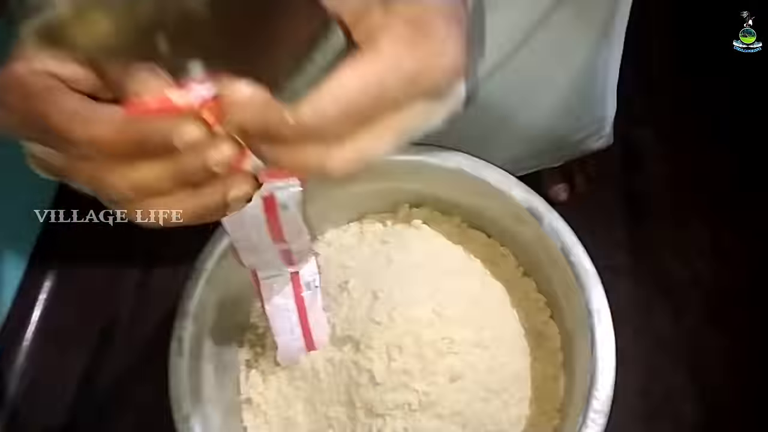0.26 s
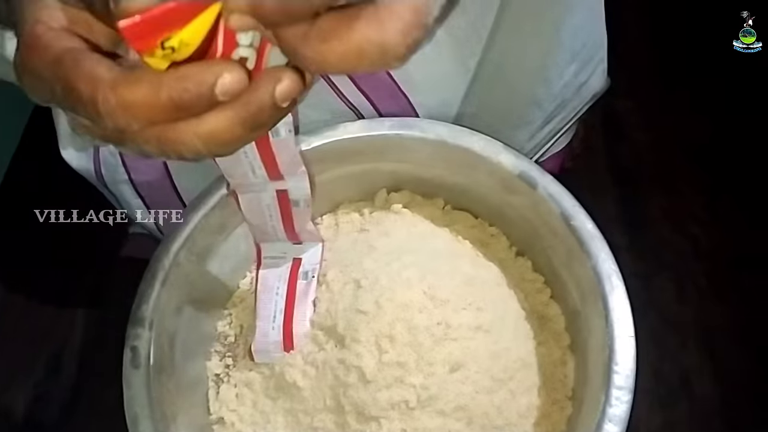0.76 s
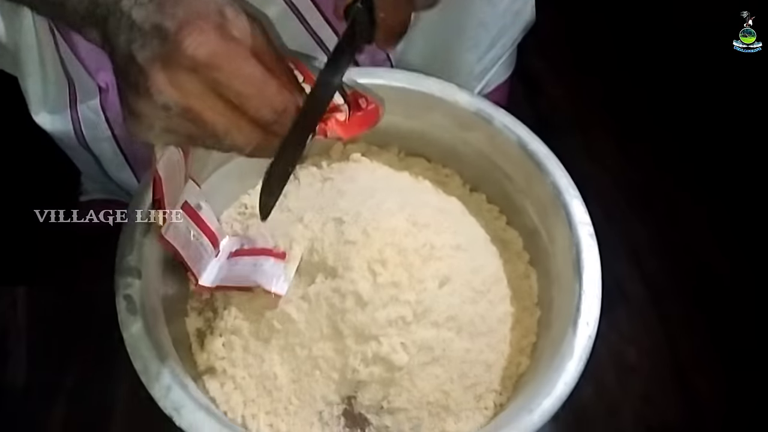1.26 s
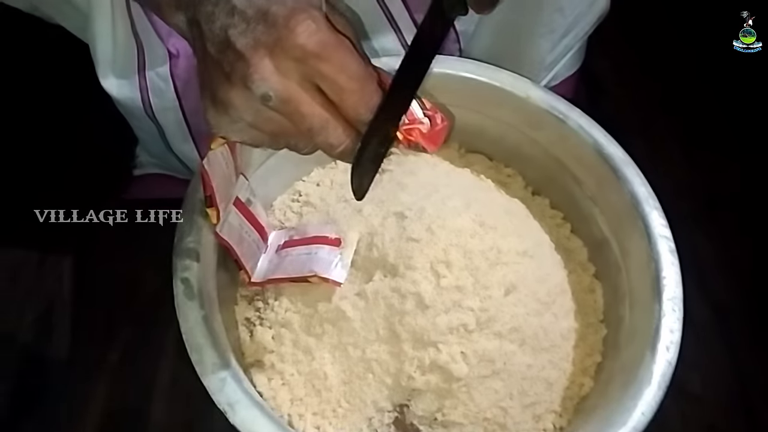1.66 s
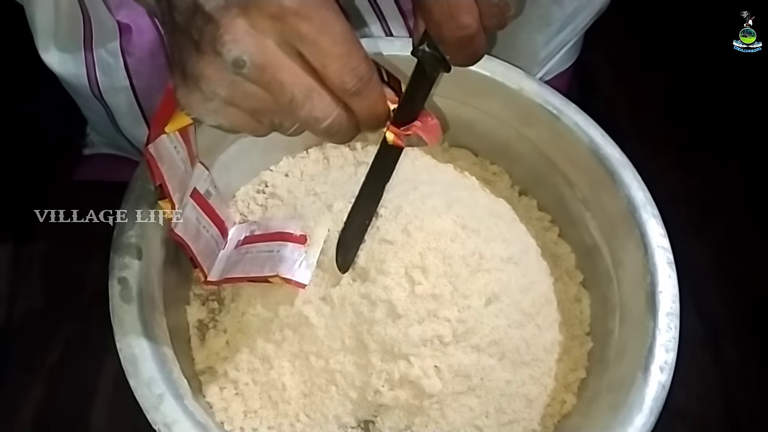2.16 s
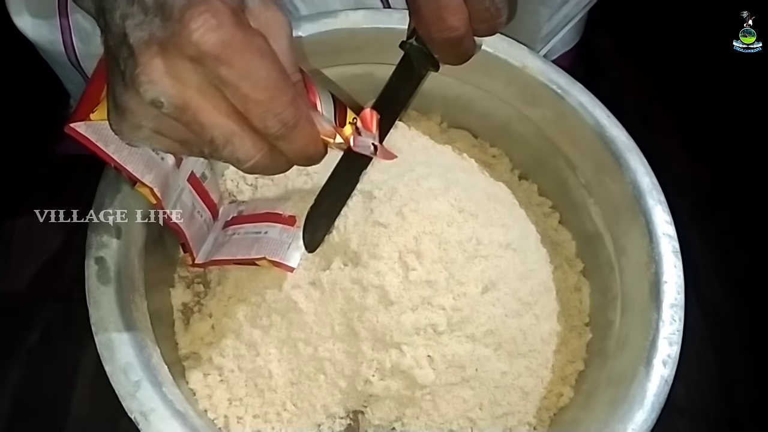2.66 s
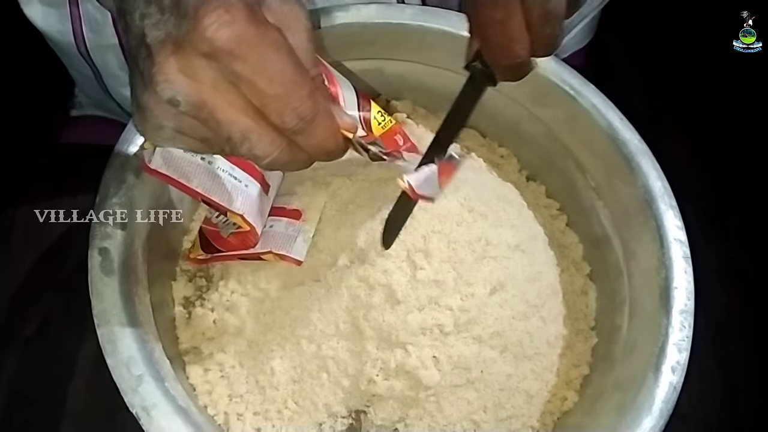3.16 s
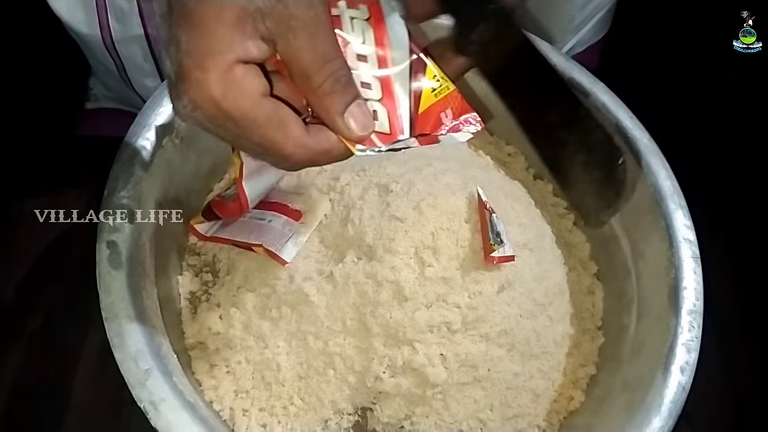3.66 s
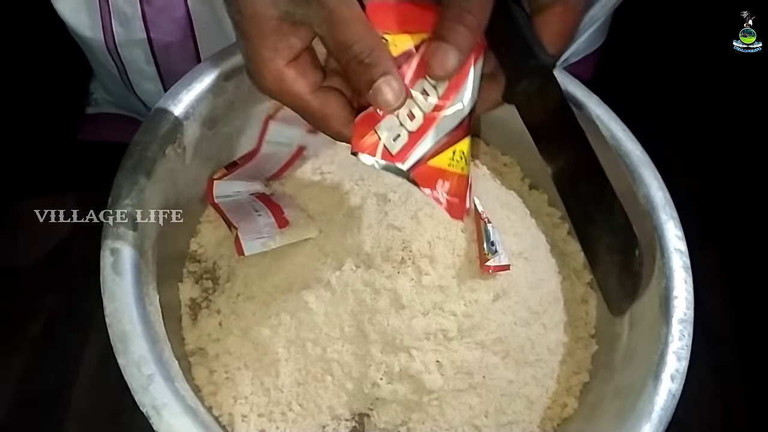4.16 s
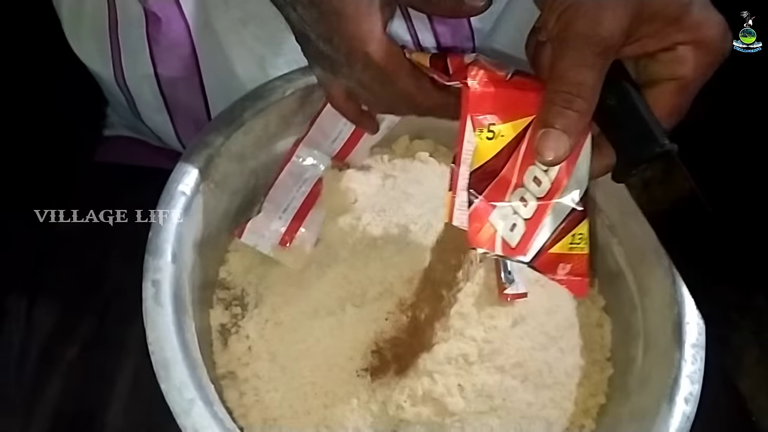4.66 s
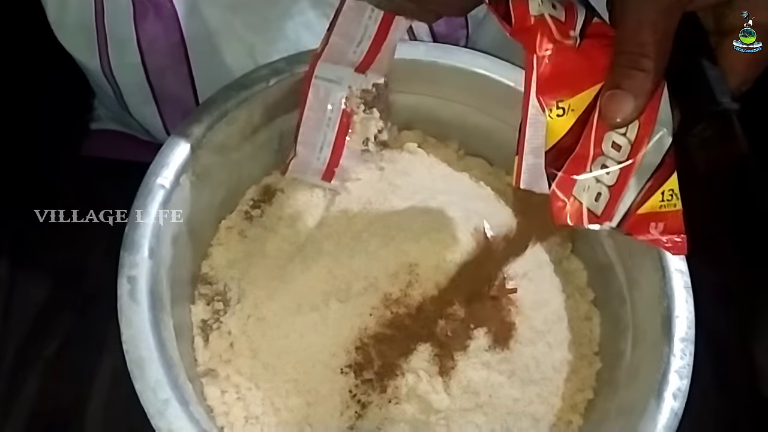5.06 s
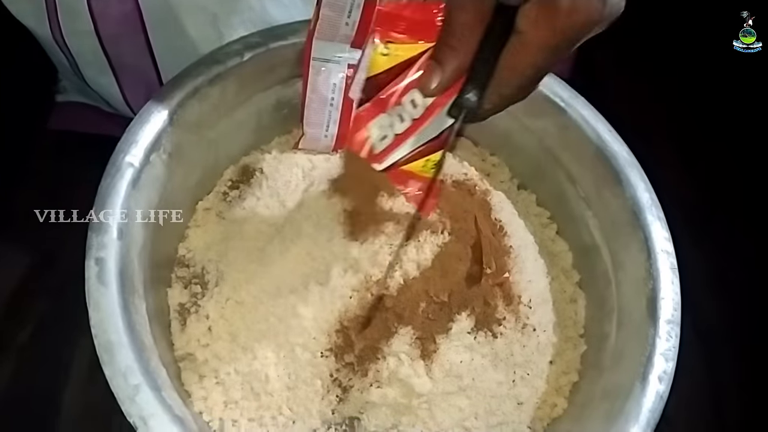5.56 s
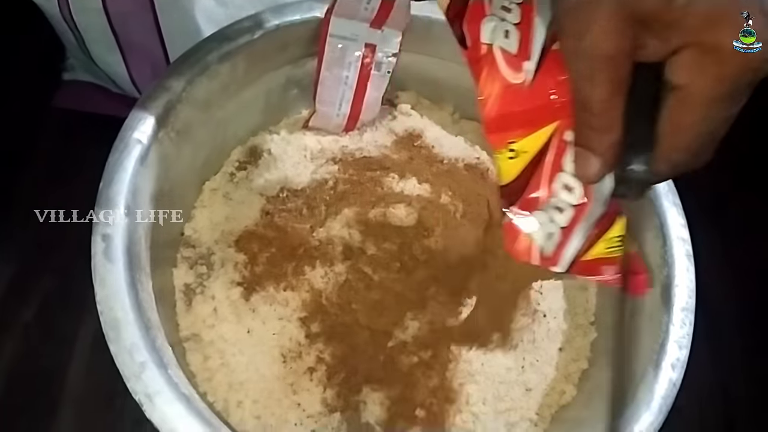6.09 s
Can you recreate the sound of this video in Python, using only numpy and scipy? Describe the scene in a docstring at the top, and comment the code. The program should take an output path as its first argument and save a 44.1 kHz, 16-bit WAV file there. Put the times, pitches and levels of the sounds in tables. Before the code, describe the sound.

Close, dry crinkling of small plastic packets, bursts of crisp knife cutting, then softer rustles and low plops of slack film.

```python
"""Foil-plastic sachets are handled over a steel bowl of flour in a small kitchen.
Fingers pull one from its strip, amid soft air bumps and padded knocks that set the bowl's modes ringing.
A knife then saws through its corner, and it is squeezed and shaken empty with low plops of slack film.
Throughout, creases snap as short slips that ring film patches, some with a short damped tone that
wavers and sags in pitch; tiny fractures crackle under each stroke, over hiss and short noise reflections."""
import sys
import numpy as np
from scipy import signal
from scipy.fft import rfft, irfft, next_fast_len
from scipy.io import wavfile
from scipy.ndimage import uniform_filter1d

SR = 44100
rng = np.random.default_rng(int(sys.argv[2]) if len(sys.argv) > 2 else 0)


def put_to_file(sound):
    """Save the sound as 16-bit audio at rate SR, in the file named by the first command-line argument."""
    columns = np.atleast_2d(sound).T  # one column per channel
    safe = np.clip(columns, -1, 1)
    whole_steps = np.round(safe * 32767)
    wavfile.write(sys.argv[1], SR, whole_steps.astype(np.int16))


N = 279153
TIME = np.arange(N) / SR

# registers of the film, from wide panels to tight creases: low_hz [Hz], high_hz [Hz]
FILM_REGISTERS = [(480, 1450), (1400, 3000), (3150, 5500), (5400, 7300)]
# fingers grip and work the film: peak_s [s], hold_s [s], level_db [dB before the mix],
# body_db [low register, dB against the middle one], brightness_db [dB, weighted by register]
FINGER_STROKES = [(0.005, 0.018, -52.5, -5, 0), (0.087, 0.0081, -51.5, -1, 5),
                  (0.198, 0.059, -46.5, 1.5, 3.5), (0.353, .02, -63, 10, -10), (0.629, .09, -47, -7, 5),
                  (0.782, 0.071, -61, -17, -5), (0.864, 0.048, -49, -4, 2), (1.005, .015, -43.5, -9.5, -3),
                  (1.037, 0.0053, -32.5, -13, 4), (1.101, 0.021, -36.5, -13, -4), (1.168, 0.037, -56, 5, 5),
                  (1.257, .03, -58.5, -10.5, 0), (1.327, 0.057, -51.5, -7, 13),
                  (1.464, .06, -65.5, -15, -10), (1.633, .12, -77.5, -10, -12),
                  (3.65, 0.042, -58, -10, -14), (3.834, .15, -55, -19, -3), (4.01, 0.026, -68, -11, -2),
                  (4.155, .11, -60, -8.5, 1), (4.276, .11, -55, -10, 3), (4.448, 0.055, -45.5, -9.5, -4),
                  (4.553, 0.243, -57, -26, -9), (4.836, .08, -53, -6.5, 0), (4.98, 0.119, -56.5, -15, -1),
                  (5.115, 0.078, -65, -6.5, -2), (5.295, 0.094, -63.5, -14, -1.5), (5.454, .14, -57, -6, 2),
                  (5.936, .03, -53.5, -11, -8.5), (5.987, 0.017, -42.5, -6, 12),
                  (6.03, .075, -47, -15, -0.5), (6.158, 0.16, -62.5, -4, -5)]
# the blade is drawn through the film: peak_s [s], hold_s [s], level_db [dB before the mix],
# body_db [low register, dB against the middle one], brightness_db [dB, weighted by register]
BLADE_STROKES = [(1.959, 0.036, -29, -7.5, 7.5), (2.031, 0.067, -45, -4.5, 4.5),
                 (2.114, 0.032, -38.5, -1.5, 5.5), (2.275, .06, -27, -7.5, 5.5),
                 (2.385, 0.043, -43, -17, 2), (2.439, 0.032, -33.5, -8.5, 1), (2.607, .05, -50.5, -2, -7.5),
                 (2.705, .06, -56, -5, -5), (2.783, .015, -51.5, -2.5, -6), (2.822, 0.012, -45.5, -7, -1),
                 (2.968, .03, -40, -11, 3), (3.072, 0.051, -37, -3, 6), (3.142, 0.013, -44, -16, 5),
                 (3.246, 0.071, -49.5, -3.5, 9), (3.317, 0.0075, -47.5, -16, 6)]


def from_db(db):
    """Decibels to gain."""
    return 10 ** (np.asarray(db) / 20)


def rms_one(x):
    """Scale to unit rms."""
    return x / np.sqrt(np.mean(x ** 2) + 1e-20)


def band(low_hz, high_hz):
    """A gentle band-pass."""
    return signal.butter(2, [low_hz, high_hz], "band", fs=SR, output="sos")


def coloured(x, points):
    """Apply a response drawn through (Hz, dB) points on a logarithmic pitch scale."""
    size = next_fast_len(N + 4096)
    hz, db = np.transpose(points)
    bins_hz = np.maximum(np.fft.rfftfreq(size, 1 / SR), 1)
    gains = from_db(np.interp(np.log(bins_hz), np.log(hz), db))
    return irfft(rfft(x, size) * gains, size)[:N]


def ring(x, hz, t60):
    """A damped resonator: a unit click sets a cosine of about height 1 ringing."""
    radius = from_db(-60 / (t60 * SR))
    angle = 2 * np.pi * hz / SR
    return signal.lfilter([.5, 0, -.5], [1, -2 * radius * np.cos(angle), radius * radius], x + 1e-18)


def drift(rate):
    """A random wander, drawn through this many normal values per second."""
    knots = rng.standard_normal(int(rate * N / SR) + 2)
    return np.interp(TIME * rate, np.arange(len(knots)), knots)


def shares(db):
    """Register levels to gains whose powers add up to 1."""
    gains = from_db(db)
    return gains / np.sqrt(np.sum(gains ** 2, axis=0))


def steady_hiss(level_db):
    """Constant background hiss: random noise with a fixed spectrum."""
    # spectrum of the hiss: pitch_hz [Hz], density_db [relative dB per Hz]
    hiss_points = [(30, -18), (150, -17), (500, -16), (1200, -15), (2300, -12), (3000, -15), (4080, -8),
                   (4450, -12), (4850, -8), (5230, 0), (5550, -6), (6000, -14), (8000, -14)]
    return from_db(level_db) * rms_one(coloured(rng.standard_normal(N), hiss_points))


def kitchen(x, near_db, near_t60, far_db, far_t60, gap_s, size=22050):
    """Quick reflections from bowl and body, and the tail of the room: two decaying bursts of echoes."""
    t, response = TIME[:size], 0
    for level_db, t60 in ((near_db, near_t60), (far_db, far_t60)):
        echoes = rng.standard_normal(size) * from_db(-60 * t / t60) * (t > gap_s)
        response = response + from_db(level_db) * rms_one(echoes) / np.sqrt(size)
    return signal.fftconvolve(x, response)[:N]


def bumps(low_hz, high_hz):
    """Air and hands close to the microphone: each bump is a brief swell of low turbulence."""
    # soft bumps: start_s [s], level_db [dB over the bump, before the microphone], length_s [s]
    bump_rows = [(0.003, -62, 0.056), (0.045, -62, 0.009), (0.203, -50, 0.011), (0.23, -77.5, .018),
                 (0.238, -65.5, .018), (0.299, -60.5, 0.023), (0.328, -55, 0.018)]
    out = np.zeros(N)
    for start_s, level_db, length_s in bump_rows:
        swell = np.sin(np.pi * np.clip((TIME - start_s) / length_s, 0, 1))
        puff = signal.sosfilt(band(low_hz, high_hz), swell * rng.standard_normal(N) + 1e-18)
        out += from_db(level_db) * rms_one(puff) * np.sqrt(length_s * SR / N)
    return out


def bowl_knocks(contact_s):
    """Padded knocks on the flour-damped bowl: each is a smooth push, and every mode answers differently."""
    # bumps of the full bowl: start_s [s], level_db [dB before the band-pass]
    knock_rows = [(1.092, -35.5), (1.113, -51), (1.193, -54.5)]
    # low modes of the bowl: pitch_hz [Hz], peak_db [dB against the knock], t60_s [s]
    bowl_modes = [(135, -11, .12), (203, -4, .2), (256, -6, .12), (281, -2, .22), (314, -1, .19),
                  (336, -4, .14)]
    out = 0
    for start_s, level_db in knock_rows:
        push = np.sin(np.pi * np.clip((TIME - start_s) / contact_s, 0, 1)) ** 2
        for hz, mode_db, t60 in bowl_modes:
            mode = ring(push, hz, t60) * rng.choice([-1, 1])
            # each answer varies by about 1 dB
            gain = from_db(level_db + mode_db + rng.normal())
            out = out + gain * mode / np.abs(mode).max()
    return signal.sosfilt(band(90, 480), out)


def sagging_tone(hz, t60, sag, waver, size=8192):
    """One exponentially damped sine; its pitch wavers at random and sags as it decays."""
    t = TIME[:size]
    unsteady = rms_one(uniform_filter1d(rng.standard_normal(size), size=220))
    # sag and waver are fractions of the pitch
    pitch_hz = hz * (1 - sag * (1 - np.exp(-t / t60)) + waver * unsteady)
    return np.sin(2 * np.pi * np.cumsum(pitch_hz) / SR) * from_db(-60 * t / t60)


def slack_flexing(low_hz, high_hz, t60, sag, waver, count=900, size=3072):
    """The emptying pouch flexes: soft, low plops of slack film, scattered in time and pitch."""
    # course of the flexing: time_s [s], level_db [dB before the microphone]
    flex_course = [(3.75, -103), (3.87, -66.5), (4.05, -87.5), (4.4, -80), (4.7, -72.5), (4.88, -62.5),
                   (5.05, -61), (5.15, -86), (5.9, -87.5), (6.08, -61.5), (6.33, -75)]
    plops = np.zeros(N + size)
    for when, place, strength in rng.random((count, 3)):
        at = int(when * N)
        hz = low_hz * (high_hz / low_hz) ** place
        plops[at:at + size] += (.5 + strength) * sagging_tone(hz, t60, sag, waver, size=size)
    time_s, level_db = np.transpose(flex_course)
    return rms_one(plops[:N]) * from_db(np.interp(TIME, time_s, level_db)) * (TIME > time_s[0])


def damped_tones(sag, waver, size=8192):
    """Short damped tones, low to high, with wavering, sagging pitch, many of them joining a snap."""
    # tones: start_s [s], pitch_hz [Hz], peak_db [dB before the mix], t60_s [s]
    tone_rows = [(.077, 5140, -28.5, 0.0086), (.229, 767, -48.5, 0.11), (0.2714, 5320, -25, 0.016),
                 (.271, 877, -42.5, 0.078), (0.331, 473, -64.5, 0.55), (0.525, 1026, -52, 0.19),
                 (.528, 1414, -51, 0.1), (.529, 1903, -40, 0.057), (0.92, 980, -40, 0.03),
                 (1.508, 1786, -53.5, 0.083), (2.787, 1694, -43.5, 0.15), (2.823, 1710, -48.5, 0.083),
                 (3.644, 2180, -53.5, 0.14), (3.692, 2906, -48.5, 0.044), (4.379, 631, -45.5, 0.025),
                 (4.642, 738, -52, 0.042), (5.031, 2394, -40, 0.019), (5.565, 3820, -32, 0.021),
                 (5.988, 3500, -24, 0.026)]
    out = np.zeros(N + size)
    for start_s, hz, peak_db, t60 in tone_rows:
        at = round(start_s * SR)
        out[at:at + size] += from_db(peak_db) * sagging_tone(hz, t60, sag, waver)
    return out[:N]


def air_push(x):
    """The broad low puff of air that moving film displaces, at unit rms."""
    return rms_one(signal.sosfilt(signal.butter(1, [320, 560], "band", fs=SR, output="sos"), x))


def effort(strokes, rise_db_per_s, sag_db_per_s, fall_db_per_s):
    """A stroke builds up, sags while held and lets go; the strongest sets level, body and brightness in dB."""
    peak_s, hold_s, level_db, body_db, bright_db = np.transpose(strokes)
    t = TIME[::32]
    age = t[:, None] - peak_s
    rise_and_sag = np.minimum(rise_db_per_s * age, -sag_db_per_s * age)
    letting_go = fall_db_per_s * np.maximum(age - hold_s, 0)
    levels = level_db + rise_and_sag - letting_go
    strongest = levels.argmax(axis=1)
    courses = (levels.max(axis=1), body_db[strongest], bright_db[strongest])
    return [np.interp(TIME, t, course) for course in courses]


def crackle(work, per_s, clump_db, ring_cycles, upper_db, top_db, flap_db, count=6):
    """Countless tiny fractures come in clumps; each rings one of several small patches per register."""
    spread_db, patchy_db = 3.5, 5.5  # unequal fracture sizes; uneven tension of the patches
    level_db, body_db, bright_db = work
    # harder work breaks the film faster
    rate = per_s * from_db(.35 * np.maximum(level_db - level_db.max(), -45))
    born = rng.random(N) < rate / SR
    sizes = from_db(spread_db * np.minimum(rng.exponential(1, N), 4)) * rng.choice([-1, 1], N)
    clicks = born * sizes
    # the hand supplies a steady effort, which the fractures share over 20 ms
    clicks = clicks / np.sqrt(np.abs(uniform_filter1d(clicks ** 2, size=882)) + 1e-4)
    clicks = clicks * rms_one(from_db(clump_db * drift(170)))
    # brightness tilts the spectrum, most of all its top
    gains = shares([body_db, 0 * body_db, 0.47 * bright_db + upper_db, 1.12 * bright_db + top_db])
    out = gains[0] * from_db(flap_db) * air_push(clicks)
    for edges, gain in zip(FILM_REGISTERS, gains):
        dealt, patches = rng.integers(0, count, N), 0
        half_step = (edges[1] - edges[0]) / count / 2
        pitches_hz = np.linspace(*edges, count + 1)[1:] - half_step
        for k, hz in enumerate(pitches_hz):
            # patches tighten and slacken as the film moves
            struck = clicks * (dealt == k) * from_db(patchy_db * drift(45))
            patches = patches + ring(struck, hz, ring_cycles / hz)
        out = out + gain * rms_one(signal.sosfilt(band(*edges), patches))
    return out * from_db(level_db)


def finger_rustle():
    """Gripping fingers break the film in fine crackle with a strong upper-middle register."""
    fingers = effort(FINGER_STROKES, rise_db_per_s=1198.5, sag_db_per_s=13, fall_db_per_s=304.5)
    return crackle(fingers, per_s=2400, clump_db=3.5, ring_cycles=10, upper_db=5.0, top_db=-4, flap_db=-4.0)


def knife_cutting():
    """The drawn blade breaks the film in denser, more even crackle with shorter rings."""
    blade = effort(BLADE_STROKES, rise_db_per_s=554.5, sag_db_per_s=39.5, fall_db_per_s=419.5)
    return crackle(blade, per_s=4200, clump_db=2.0, ring_cycles=7.3, upper_db=3.5, top_db=-0.7, flap_db=-8.5)


def small_creases(strokes):
    """Lesser snaps at chance moments of each stroke, stronger where it is firm; rows as for snaps()."""
    # registers of a small crease: low, middle, top [dB against the upper-middle one]
    small_registers_db = (-9.5, -1.5, -1.5)
    per_s, usual_db, spread_db = 22, -54.5, 1.5  # snaps under an ordinary grip
    ordinary_grip_db, follows = -57.5, 0.52  # share of a firmer stroke's extra dB that they gain
    rows = []
    for (peak_s, hold_s, level_db, _, _), draws in zip(strokes, rng.random((len(strokes), 8, 2))):
        waits = np.cumsum(-np.log(1 - draws[:, 0])) / per_s
        firm_db = follows * (level_db - ordinary_grip_db)
        snaps_db = usual_db + firm_db + spread_db * (2 * draws[:, 1] - 1)
        for wait, snap_db in zip(waits, snaps_db):
            if wait < hold_s:
                rows.append((peak_s + wait, snap_db, *small_registers_db))
    return rows


def snaps(rows, ring_cycles, ring_s, flap_db, size=1024, count=176):
    """Each crease gives way in a short slip and rings one film patch per register, at a pitch of its own."""
    # an ordinary snap's slip time; harder ones slip faster (dB of slip time per dB of level)
    ordinary_db, ordinary_slip_s, shortens = -43, 0.0015, 0.39
    out, t = np.zeros(N + SR), TIME[:size]
    filters = [band(*edges) for edges in FILM_REGISTERS]
    for start_s, level_db, low_db, middle_db, top_db in rows:
        # the slip is itself an uneven run of tiny jerks
        slip_s = ordinary_slip_s * from_db(shortens * (ordinary_db - level_db))
        slip = rng.laplace(size=size) * np.exp(-t / slip_s)
        gains, snap = shares([low_db, middle_db, 0, top_db]), 0
        for edges, sos, gain, place in zip(FILM_REGISTERS, filters, gains, rng.random(4)):
            hz = edges[0] + (edges[1] - edges[0]) * place
            patch = ring(slip, hz, ring_s + ring_cycles / hz)
            snap = snap + gain * rms_one(signal.sosfilt(sos, patch))
        # a wide panel also pushes a little air
        snap = snap + gains[0] * from_db(flap_db) * air_push(slip)
        at = round(start_s * SR)
        # the level counts the snap's energy as if it fell within 4 ms
        out[at:at + size] += from_db(level_db) * rms_one(snap) * np.sqrt(count / size)
    return out[:N]


def buckling_creases():
    """Sharp snaps of buckling creases, joined by the small ones under fingers and blade."""
    # buckling creases: start_s [s], level_db [dB before the mix],
    # low_db, middle_db, top_db [registers, dB against the upper-middle one]
    snap_rows = [(0.018, -54, -11, 1, -1), (0.062, -40, -12, -15, -7), (0.0755, -30, -18, -9, -7),
                 (0.189, -42, -14, -8, -6), (0.2298, -33, -11, -10, 1), (0.2383, -52, -1, -2, 1),
                 (0.252, -40, -7, 3, 0), (0.2697, -26, -17, -14, -4), (0.3517, -51, -13, -3, -4),
                 (0.3974, -50, -8, 3, -3), (0.42, -52, -10, 3, -4), (0.4941, -58, -9, -6, -8),
                 (0.5269, -36, 3, 4, -7), (0.5903, -49, -33, -7, -13), (0.6237, -26, -23, -2, -15),
                 (0.6453, -35, -34, -12, -7), (0.6701, -35, -32, 1, -3), (0.6873, -37, -29, -11, 0),
                 (0.7028, -32, -34, -11, -3), (0.748, -37, -25, -5, 1), (0.7915, -53, -30, -4, -1),
                 (0.8219, -47, -26, 1, -1), (0.8355, -39, -25, -11, -12), (0.8797, -37, -17, 5, -5),
                 (0.9118, -40, -21, -15, -7), (0.921, -41, 8, 4, -10), (0.9875, -46, -10, -1, 1),
                 (1.016, -36, -18, -2, -2), (1.0305, -26, -17, -2, -9), (1.0424, -33, -25, -12, -14),
                 (1.0552, -35, -13, -3, -7), (1.1045, -36, -30, -16, -10), (1.1224, -43, -5, 0, -8),
                 (1.1343, -38, -16, -1, 1), (1.1695, -48, -5, 5, -3), (1.199, -43, -9, 4, -5),
                 (1.304, -52, -11, 6, -6), (1.334, -45, -13, -6, -10), (1.3875, -46, -31, -21, -4),
                 (1.464, -52, -2, 4, -3), (1.5083, -47, -8, 9, -5), (1.6286, -52, -18, 1, -13),
                 (1.899, -51, -5, 6, -11), (1.9274, -37, -15, -14, 2), (1.9715, -28, -21, 2, 1),
                 (1.9848, -30, -10, 7, 9), (2.072, -38, -23, -5, 3), (2.1459, -30, -7, 2, 5),
                 (2.2151, -46, -2, 2, 2), (2.2327, -29, -17, -1, 9), (2.2524, -31, -11, 0, 0),
                 (2.264, -28, -6, -6, -2), (2.4842, -38, -9, -1, -5), (2.5613, -54, -4, 5, -6),
                 (2.597, -42, -1, 4, 3), (2.649, -47, -20, -13, -2), (2.691, -50, -10, -3, -6),
                 (2.7564, -48, -5, -7, 1), (2.7884, -41, -1, 2, -1), (2.8236, -44, 8, 9, 7),
                 (2.9942, -40, -19, -9, -9), (3.0509, -40, -11, -1, -3), (3.2156, -51, -5, -2, -4),
                 (3.3088, -43, -30, -11, 2), (3.342, -48, -10, -4, 7), (3.5661, -53, -8, 3, -7),
                 (3.629, -48, -4, 5, -9), (3.6443, -42, 6, 19, -3), (3.6939, -50, -5, 14, -15),
                 (3.7846, -60, -11, -1, -10), (3.8227, -49, -5, 7, -14), (3.8571, -48, -6, -3, -9),
                 (3.9234, -42, -11, 0, -10), (3.9705, -51, -1, 5, -6), (4.0952, -61, -11, 3, -11),
                 (4.145, -64, -27, 0, -15), (4.173, -51, -7, 4, -2), (4.2036, -51, -8, -1, -14),
                 (4.2407, -47, 2, 14, -1), (4.2737, -46, -16, -18, -11), (4.2813, -51, -14, 0, -9),
                 (4.3183, -45, -5, 1, -7), (4.3783, -42, 0, -2, -15), (4.4466, -41, -11, 0, -9),
                 (4.4637, -46, -7, -4, -13), (4.5655, -54, -21, 8, -16), (4.5958, -45, -17, 0, -12),
                 (4.6729, -46, -17, 1, -26), (4.714, -50, 2, 14, -19), (4.7635, -41, -6, -2, -16),
                 (4.8258, -47, -14, 0, -19), (4.8371, -47, -11, -6, -13), (4.8702, -38, -12, -5, -16),
                 (4.9503, -38, -25, -6, -17), (5.0294, -43, -12, 5, -15), (5.0502, -37, -11, -3, -10),
                 (5.361, -41, 4, 10, -6), (5.4348, -54, -23, 2, -12), (5.4721, -40, -9, 5, -13),
                 (5.5134, -35, -16, 2, -11), (5.5647, -31, -19, -14, -24), (5.5719, -40, -12, 6, -10),
                 (5.5893, -39, -7, -7, -13), (5.7033, -51, -39, -9, -10), (5.75, -64, -27, -3, -9),
                 (5.886, -57, -13, -3, -15), (5.9285, -43, -13, -6, -23), (5.9756, -36, -7, 2, -12),
                 (5.9886, -27, -15, -11, -8), (6.0213, -39, -5, 8, -15), (6.0754, -44, 9, 15, -13),
                 (6.0856, -36, -35, -18, -8), (6.1633, -46, -25, -15, -26), (6.2439, -42, -4, 8, -17),
                 (6.27, -48, -8, 2, -17), (6.3158, -40, -13, 10, -12)]
    rows = [*snap_rows, *small_creases(FINGER_STROKES + BLADE_STROKES)]
    return snaps(rows, ring_cycles=2.6, ring_s=0.0025, flap_db=-11.0)


def scene():
    """Film and bowl share the room; air bumps and hiss stay dry."""
    hiss = steady_hiss(level_db=-74.5)
    air = bumps(low_hz=54, high_hz=144.4)
    knock = bowl_knocks(contact_s=0.002)
    slack = slack_flexing(low_hz=285, high_hz=1400, t60=.065, sag=.1, waver=.05)
    tones = from_db(1.0) * damped_tones(sag=0.038, waver=0.061)
    rustle = from_db(-4.5) * finger_rustle()
    cutting = from_db(-1.78) * knife_cutting()
    creases = from_db(-0.79) * buckling_creases()
    film = creases + tones + slack + rustle + cutting
    room = kitchen(film + knock, near_db=-6.5, near_t60=0.083, far_db=-16, far_t60=0.23, gap_s=0.0016)
    return (film + knock + room + air + hiss)[None]


def record(dry):
    """A narrow-band microphone channel, with faint converter noise reaching above it."""
    # microphone colour: pitch_hz [Hz], gain_db [dB]
    microphone_colour = [(100, -4.5), (400, -6), (800, -1.5), (1300, 1.5), (1800, 0.5), (2400, 3.5),
                         (3050, -4.5), (3600, 1.5), (4300, -0.5), (5100, 2), (6400, 0.5), (7100, -5.5),
                         (8100, 1)]
    band_limit_hz, cutoff_hz = 8350, 15700  # of the microphone channel; of everything, noise included
    channel = signal.cheby2(12, 50, band_limit_hz, fs=SR, output="sos")
    narrow = signal.sosfilt(channel, coloured(dry[0], microphone_colour))
    noisy = narrow + from_db(-90.5) * rng.standard_normal(N)
    return signal.sosfilt(signal.ellip(10, .2, 70, cutoff_hz, fs=SR, output="sos"), noisy)[None]


dry = scene()
out = record(dry)
put_to_file(out)
```